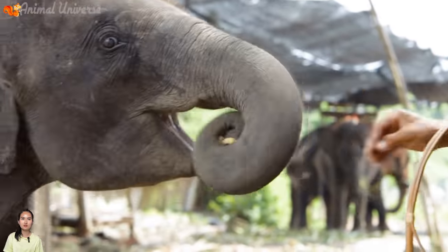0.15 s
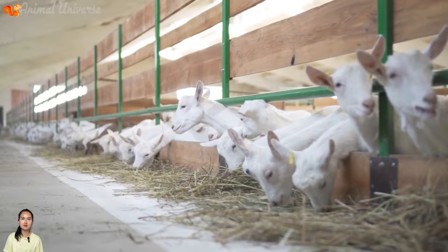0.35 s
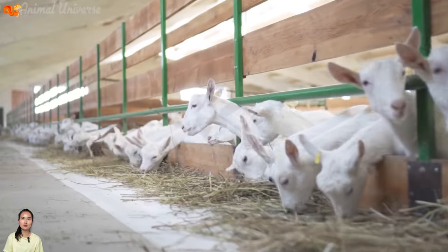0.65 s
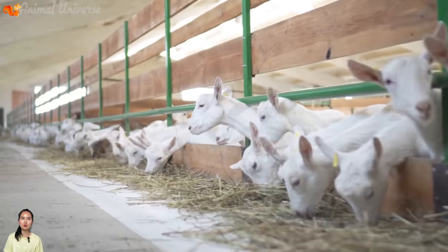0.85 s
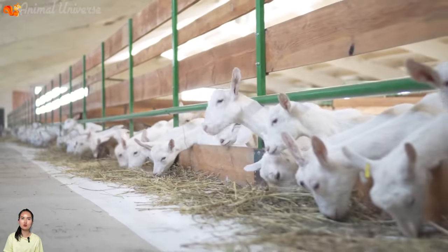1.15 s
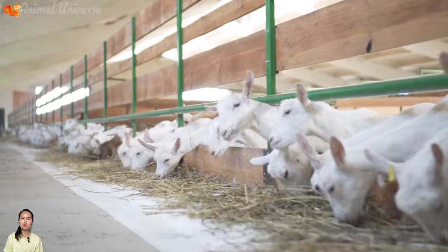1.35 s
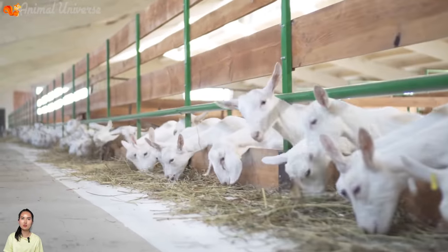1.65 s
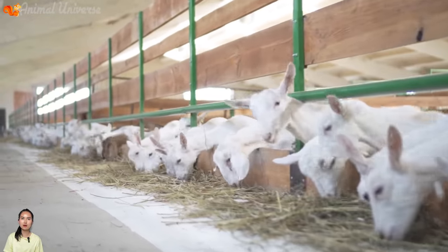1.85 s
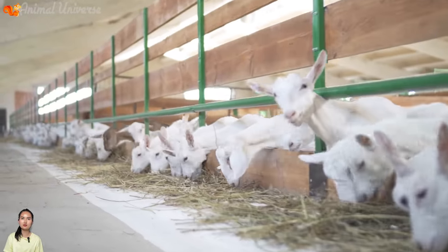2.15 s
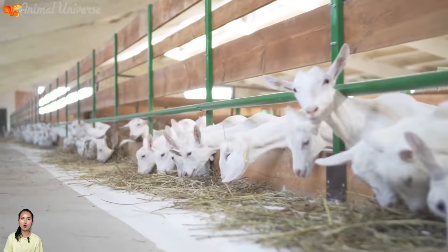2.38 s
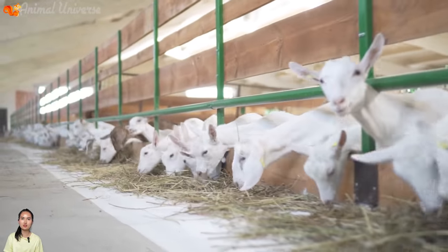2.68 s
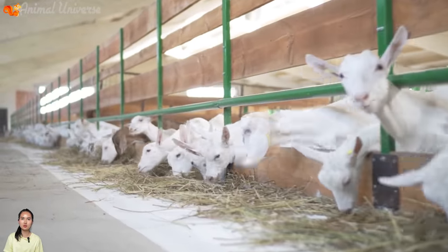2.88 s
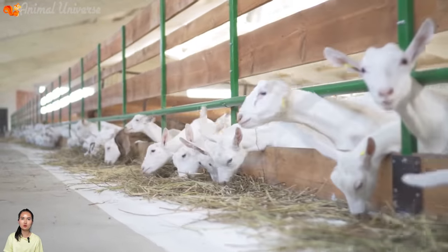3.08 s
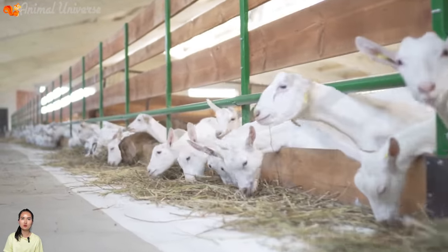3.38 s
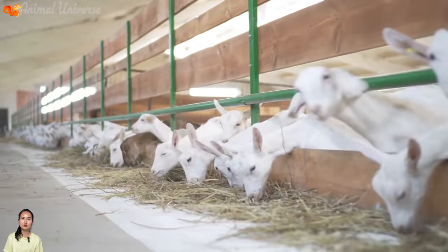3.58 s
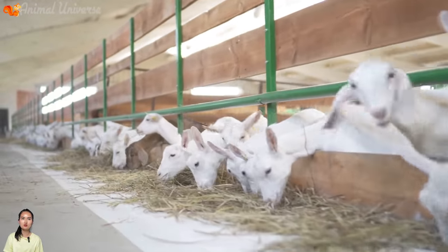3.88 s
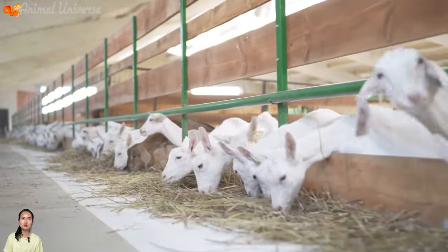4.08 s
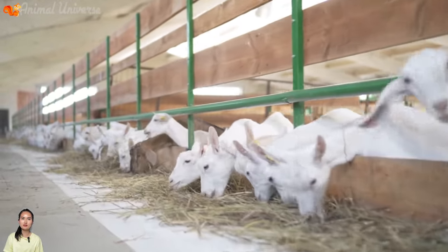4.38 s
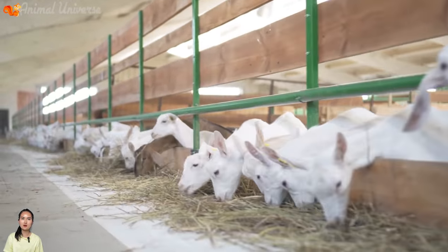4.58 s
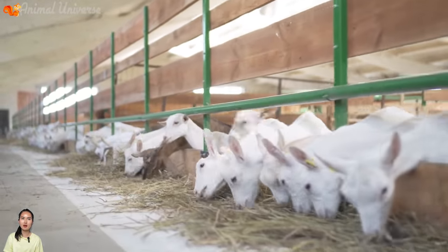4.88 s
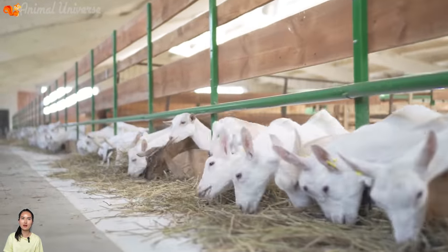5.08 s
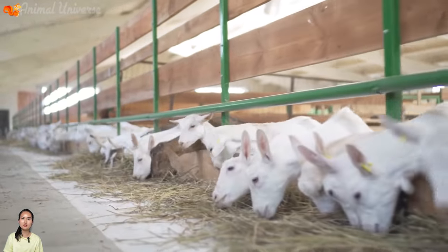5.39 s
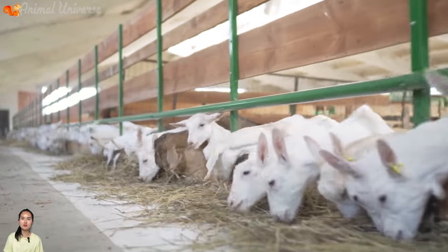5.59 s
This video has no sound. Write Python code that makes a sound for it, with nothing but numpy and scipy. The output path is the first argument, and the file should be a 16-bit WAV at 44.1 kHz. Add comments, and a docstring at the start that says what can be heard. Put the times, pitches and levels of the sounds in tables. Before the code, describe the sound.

A short, rough elephant roar stops dead, then goats bleat one after another in a barn over rustling hay and wooden knocks.

```python
"""Elephant roar, then goats in a barn

An elephant's heavy vocal folds flap out a short, rough roar that stops dead. Goats then bleat one after
another down a long barn: buzzing folds and breath, shaped by each throat. Most bleats throb about eleven
times a second, pitch, loudness and brightness swelling together. Underneath, the herd knocks at the
wooden trough and stirs the hay, with a few deep bumps and faint, recurring dry ticks."""
import sys
import numpy as np
from scipy import signal
from scipy.fft import rfft, irfft, next_fast_len
from scipy.io import wavfile
from scipy.ndimage import uniform_filter1d, map_coordinates

SR = 44100
rng = np.random.default_rng(int(sys.argv[2]) if len(sys.argv) > 2 else 0)


def inscribe(sig):
    """Save sig as 16-bit PCM at rate SR to the path in sys.argv[1].

    A 1-D sig is mono; a 2-D sig holds one channel per row.
    Samples are clipped to [-1, 1] before scaling.
    """
    pcm = np.round(np.clip(np.atleast_2d(sig).T, -1, 1) * 32767)
    wavfile.write(sys.argv[1], SR, pcm.astype(np.int16))


N = 253134
TOP_HZ = 16000
ROAR_END_S = 0.383
CLEAR_AIR, RELAXED_AIR, HOARSE_AIR = 0.035, 0.07, 0.13  # breathiness of a bleat
CRACK_DELAY_S, CRACK_WIDTH_S = 0.013, 0.008  # the voice cracks just after each throb
THROAT_DRIFT = 0.035  # share by which the throat's resonances wander up and down

# the herd's activity at the hay: t/s, shuffle level/dB, rustle level/dB
HERD_LEVELS = [(0.4, -41, -40), (1.2, -44, -40.5), (1.6, -45.5, -54), (2.28, -35.5, -46.5),
               (2.8, -35.5, -41), (3.12, -43.5, -46.5), (3.9, -38.5, -39.5), (4.7, -37, -42.5),
               (4.88, -42, -53.5), (5.1, -41, -42.5), (5.74, -33, -52)]
# noise colours of shuffling bodies, rustling hay, a tick and a wooden clack: f/Hz, level/dB
SHUFFLE_EQ = [(15, -20), (28, -10), (50, -6.5), (100, -0.5), (170, 0.5), (330, 1), (620, -4), (1300, -3.5),
              (1600, -7.5), (2300, -29.5), (4700, -43), (8000, -59), (16000, -56)]
HAY_EQ = [(500, -19), (2000, -4), (5000, -6.5), (9000, -14.5), (15500, -28)]
TICK_EQ = [(1500, -26), (4000, -11), (8000, -1.5), (12000, -5), (16000, -7)]
CLACK_EQ = [(200, -27), (500, 7), (1400, 5), (2600, 0), (6000, -47), (15000, -66)]
# dull, deep bumps: t/s, level/dB, swell and fade time/s, centre f/Hz
BUMP_CUES = [(0.867, -31, 0.032, 61.6), (4.732, -32.5, 0.1, 124), (5.735, -30, 0.032, 113.4)]
# dry ticks, each a quick three: t/s, level/dB
TICK_CUES = [(0.765, -23), (1.227, -25), (1.675, -20.5), (2.122, -26.5), (2.576, -23.5), (3.023, -29.5),
             (3.504, -26.5), (3.923, -22.5), (4.374, -29), (4.824, -24.5), (5.249, -27.5)]
# knocks on the trough: t/s, level/dB, clack trim/dB
KNOCK_CUES = [(0.466, -25, -10), (0.603, -34, 6), (0.815, -30, -10), (1.502, -31, 7), (1.957, -32, -15),
              (3.177, -31, -12), (3.282, -24, -14), (3.315, -26, -22), (3.437, -27, -22), (3.602, -28, -22),
              (3.753, -29, -20), (3.934, -27, -10), (4.034, -31, -15), (4.216, -23, -10), (4.654, -29, -14),
              (5.092, -29, 5), (5.588, -29, -15), (5.68, -23, -4)]
# modes of the trough's boards: f/Hz, level/dB, t60/s
TROUGH_MODES = [(84, -34, 0.19), (136, -7.5, 0.23), (178.3, -3.5, 0.23), (248.4, -3, 0.24),
                (320, -1.5, 0.09), (427, 13.5, 0.022)]
# the barn's reverb time: f/Hz, t60/s
BARN_DECAY = [(150, 1), (700, 0.31), (1500, 0.63), (3500, 0.34), (7000, 0.27), (14000, 0.0088)]
# narrow resonances that ring on in the barn: f/Hz, level/dB, t60/s
BARN_MODES = [(1330, -56, 0.6), (1490, -55, 0.8), (1645, -54, 1.3), (3400, -54, 1.4), (3880, -64, 1.1)]
# the roar's envelope: t/s, level/dB
ROAR_LEVELS = [(0, -15), (0.1, -16.5), (0.17, -15.5), (0.23, -15.5), (0.32, -17), (0.38, -15.5)]
# resonances of the elephant's trunk: f/Hz, level/dB
TRUNK_EQ = [(35, -110), (60, -28), (86, -34.5), (125, -13), (266, -12.5), (365, -1.5), (449, -15),
            (531, -4.5), (600, -11.5), (680, -7), (780, -21), (880, -15), (1000, -23.5), (1250, -28.5),
            (1610, -27.5), (1830, -36.5), (2350, -34.5), (3810, -52.5), (8000, -68), (16000, -71)]
# resonances of each goat's throat: f/Hz, level/dB
KID_THROAT = [(250, -17), (480, -7), (950, -12.5), (1480, -3), (1950, -17), (2300, -8.5), (2780, -26.5),
              (3480, -0.5), (3800, -8), (4550, -1), (5200, -10), (5700, -5.5), (6500, -16.5), (7300, -12),
              (8300, -27), (9700, -26.5), (12300, -28.5), (14000, -48)]
OLD_THROAT = [(150, -42), (250, -11), (661, 5), (777, 10), (928, 1), (1010, 2), (1300, -4), (1960, -9.5),
              (2160, -20), (2580, -7.5), (3080, -2.5), (3860, -19.5), (4600, -18.5), (5880, -27.5),
              (12000, -43), (15600, -79)]
LOUD_THROAT = [(250, -21), (450, -5), (900, -3.5), (1350, -1.5), (1780, -2), (2270, -17), (2700, -20.5),
               (3180, -8), (3800, -42), (5000, -17), (5700, -31.5), (6400, -24), (7400, -39.5), (9200, -31),
               (11800, -56), (12800, -42), (14000, -58)]
JOINING_THROAT = [(450, -27), (900, -1.5), (1200, -2), (1420, -12), (1650, -18), (2400, -14), (2850, -3),
                  (3250, 15.5), (3650, -6.5), (4500, -10), (5400, -8), (6400, -34), (7700, -14.5),
                  (12000, -54)]
CRYING_THROAT = [(200, -27), (320, -8), (620, -0.5), (780, 24.5), (950, 22), (1090, -7), (1300, 4),
                 (1650, 0), (1980, -1.5), (2400, -35.5), (3100, -17.5), (4100, -28), (4750, -19.5),
                 (5600, -42), (6300, -20.5), (7400, -49), (13000, -68)]
THIN_THROAT = [(250, -30.5), (420, 3), (850, 6), (1250, 6.5), (1650, 6.5), (2100, 3), (2600, 8.5),
               (3200, 3), (3700, -15), (4200, -13), (5200, -24), (5800, -6), (6200, -30), (6700, -11),
               (7500, -31), (9000, -34), (12000, -59)]
NASAL_THROAT = [(210, -55.5), (350, -13.5), (443, -21), (661, -17.5), (838, -19.5), (1020, -16.5),
                (1250, -23), (1630, -16.5), (2820, -30.5), (3520, -12.5), (4140, -28), (5160, -21.5),
                (7930, -26), (9330, -37), (12000, -62), (15600, -83), (22000, -120)]
# the kid's throat colour in its short bleat, stronger near 900 Hz: f/Hz, level/dB
SHORT_BLEAT_THROAT = [(250, -46), (450, -15), (900, -6.5), (1350, -7.5), (1750, -14), (2250, -8.5),
                      (2800, -19.5), (3300, -3), (3750, -14.5), (4550, -1), (5500, -12), (7500, -17),
                      (11000, -26.5), (15000, -48)]
# the jaw closes between throbs and the lowest resonance sinks away: f/Hz, level/dB
JAW_SHUT_EQ = [(480, -1.5), (850, -5), (1250, -1.5), (1700, 1.5), (2400, 2.5)]
# bleats, one row a throb: t/s, pitch/Hz, level/dB, fundamental trim/dB, treble trim/dB
SOFT_BLEAT = [(0.405, 422, -27.5, 6.5, -7.5), (0.498, 420.8, -26, -1.5, -10.5),
              (0.603, 421.5, -24.5, 0, -11), (0.712, 426.3, -26.5, 1.5, -4.5)]
RISING_BLEAT = [(0.797, 474.7, -28.5, 1.5, -2.5), (0.873, 497.8, -26.5, 2.5, -1),
                (0.952, 506.6, -23.5, 2, -3.5), (1.032, 517.3, -20.5, -13.5, -1.5),
                (1.128, 503.5, -17, -18.5, -2)]
SHORT_BLEAT = [(1.7, 391, -41.5, -5, -1), (1.792, 449.3, -24, -7.5, -5.5), (1.879, 450, -22.5, -9, 1.5),
               (1.976, 461.5, -19, -15, 1)]
DEEP_BLEAT = [(2.29, 284.5, -39.5, 3, -12), (2.378, 325.7, -28.5, -7.5, -8.5),
              (2.465, 327, -26, -9.5, -10.5), (2.545, 336.1, -24.5, -6.5, -11.5),
              (2.625, 340.3, -24.5, -3, -13.5), (2.712, 342.3, -24.5, -6.5, -13),
              (2.805, 340, -25.5, -3.5, -13), (2.89, 334, -25.5, -5.5, -11.5), (2.972, 321.7, -27, -14, -8),
              (3.005, 284, -38, -5, -19)]
LOUD_BLEAT = [(3.205, 433.8, -23, -4, -12.5), (3.29, 462.6, -18, -1.5, -8), (3.383, 459.5, -17, -4, -8),
              (3.477, 459.7, -16.5, -3, -6), (3.575, 453, -17, -3.5, -7), (3.675, 449.5, -18, -3.5, -8),
              (3.775, 436, -22.5, -2, -5.5), (3.868, 408.7, -27, -10, -11.5)]
SECOND_DEEP_BLEAT = [(3.96, 291.3, -28, -7, -12.5), (4.05, 340.1, -20.5, -5.5, -11),
                     (4.132, 340.6, -22, -7, -12), (4.215, 346, -21.5, -4, -7),
                     (4.295, 350.8, -21, -0.5, -16), (4.39, 359.6, -22.5, -10.5, -0.5)]
JOINING_BLEAT = [(4.287, 471, -16.5, -29, 1.5), (4.392, 397, -21.5, -16, -6.5)]
KID_BLEAT = [(4.245, 452.7, -27.5, -5, -4), (4.34, 454, -32, 1, 2), (4.41, 469, -25, -29, 1)]
FAINT_BLEAT = [(4.95, 436.7, -35, -9, 2)]
NASAL_BLEAT = [(5.27, 333.8, -30, 1.7, -5.5), (5.372, 412.4, -28, 3.5, 2), (5.468, 431.5, -23.5, 1, 0),
               (5.565, 433, -22.5, 0.52, 0.5), (5.657, 434.7, -23.5, 1.43, 0), (5.748, 425, -27, 6.4, 1.5)]
# held calls that waver without a break: t/s, pitch/Hz, level/dB, fundamental trim/dB, treble trim/dB
CRYING_BLEAT = [(4.462, 297, -18.5, -31, -12), (4.483, 307.5, -17, -32, -12.5),
                (4.505, 335, -19.5, -17, -6), (4.528, 314.3, -20, -25, -7), (4.555, 314.7, -26, -14, -1.5),
                (4.592, 346, -25, -6, 1.5), (4.625, 320, -19.5, -25, -6.5), (4.685, 329.6, -21, -17, -4.5),
                (4.71, 297, -20, -24, -10.5), (4.75, 266, -19, -18, -16.5)]
THIN_BLEAT = [(5.058, 444, -29, -10, 0), (5.087, 395, -28.5, -21, -1), (5.12, 410.7, -29.5, -11, 0),
              (5.148, 465.6, -33, -15, 4.5), (5.165, 419.4, -31.5, -8, 6.5),
              (5.186, 432.8, -26, -1.5, -4.5), (5.22, 418.3, -34.5, -6, 6), (5.275, 411.1, -31.5, -21, -3),
              (5.32, 392.4, -30, -10, -5), (5.365, 406.8, -25.5, -3, -21)]


def amp(db):
    """Decibels to gain."""
    return 10 ** (np.asarray(db) / 20)


def unit(x):
    """x at rms 1."""
    return x / np.sqrt(np.mean(x ** 2) + 1e-20)


def levelled(x):
    """x with its gain ridden to hold rms 1 over 40 ms."""
    return x / np.sqrt(np.abs(uniform_filter1d(x * x, SR // 25)) + 1e-12)


def along(points, hz):
    """(f/Hz, value) points read on a log axis."""
    f, v = np.transpose(points)
    return np.interp(np.log(hz + 1), np.log(f + 1), v)


def curves(rows, t):
    """Automation: each column after the time, read at times t."""
    times, *columns = np.transpose(rows)
    return [np.interp(t, times, column) for column in columns]


def wobble(t, rate):
    """A smooth random curve, rate knots a second."""
    u = (t - t[0]) * rate
    return map_coordinates(rng.standard_normal(int(u[-1]) + 4), [u])


def lowpass(hz, edge_hz):
    """Gain of a steep low-pass."""
    return 1 / (1 + (hz / edge_hz) ** 12)


def filtered(x, response):
    """x through a response given as a function of frequency."""
    n = x.shape[-1]
    size = next_fast_len(n + 8192)
    return irfft(rfft(x, size) * response(np.fft.rfftfreq(size, 1 / SR)), size)[..., :n]


def coloured(x, eq, size=2048):
    """x through a minimum-phase EQ curve."""
    cepstrum = irfft(np.log(amp(along(eq, np.fft.rfftfreq(size, 1 / SR)))))
    cepstrum[1:size // 2] *= 2
    cepstrum[size // 2 + 1:] = 0
    return signal.fftconvolve(x, irfft(np.exp(rfft(cepstrum))))[:len(x)]


def noise(eq, n, width):
    """Coloured stereo noise of rms 1; width is side over mid."""
    mid, side = filtered(rng.standard_normal((2, n)), lambda hz: amp(along(eq, hz)))
    return unit(np.array([mid + width * side, mid - width * side]))


def add(out, x, start):
    """Mix stereo x into out from start, in seconds."""
    i = max(round(start * SR), 0)
    out[:, i:i + x.shape[1]] += x[:, :max(N - i, 0)]


def herd():
    """The bed: many animals shuffle and pull at the hay."""
    t = np.arange(N) / SR
    shuffle_db, rustle_db = curves(HERD_LEVELS, t)
    shuffle = noise(SHUFFLE_EQ, N, width=.45) * amp(shuffle_db + 1.8 * wobble(t, 18))
    hay = noise(HAY_EQ, N, width=.7) * amp(rustle_db + 1.5 * wobble(t, 60))
    return shuffle + hay


def bumps():
    """Something heavy shifts with a soft, deep rumble that swells and fades."""
    out, t = np.zeros((2, N)), np.arange(N) / SR
    for peak, db, fade, hz in BUMP_CUES:
        eq = [(hz / 4, -12), (hz, 0), (1.97 * hz, -7), (3 * hz, -35), (10 * hz, -90)]
        out += noise(eq, N, width=.099) * amp(db) * np.exp(-np.abs(t - peak) / fade)
    return out


def ticks(spacing_s=.009, t60=.005):
    """Tiny dry ticks in quick threes."""
    out, t = np.zeros((2, N)), np.arange(SR // 50) / SR
    decay = amp(-60 * t / t60)
    for start, db in TICK_CUES:
        for k in range(3):
            tick = noise(TICK_EQ, len(t), width=.47) * amp(db - .45 * k) * decay
            add(out, tick, start + k * spacing_s)
    return out


def trough():
    """Hooves and heads bump the wooden boards: a dull thud with a short clack."""
    out, t = np.zeros((2, N)), np.arange(SR // 4) / SR
    attack = 1 - np.exp(-t / .0016)
    for start, db, clack_db in KNOCK_CUES:
        thud = np.zeros(len(t))
        for hz, mode_db, t60 in TROUGH_MODES:
            decay = amp(mode_db + rng.normal(0, 4.1) - 60 * t / t60)
            detuned_hz = hz * rng.uniform(.897, 1.1)
            thud += decay * np.sin(2 * np.pi * (detuned_hz * t + rng.random()))
        clack = noise(CLACK_EQ, len(t), width=.5) * amp(clack_db - 2 - 60 * t / .06)
        add(out, amp(db) * (amp(-3.5) * thud + clack) * attack, start)
    return out


def barn_reverb(x):
    """The barn's diffuse tail, different at each ear, with a few tones that ring on."""
    hz, t, spectrum = signal.stft(rng.standard_normal((2, SR * 3 // 4)), SR, nperseg=256)
    decay = amp(-60 * t / along(BARN_DECAY, hz)[:, None])
    attack = 1 - np.exp(-t / .00056)
    _, tail = signal.istft(spectrum * decay * attack, SR, nperseg=256)
    age = np.arange(tail.shape[1]) / SR
    rings = sum(amp(db - 60 * age / t60) * np.sin(2 * np.pi * (f * age + rng.random((2, 1))))
                for f, db, t60 in BARN_MODES)
    mid, side = tail / np.linalg.norm(tail[0]) + rings
    side = filtered(side, lambda hz: hz / (hz + 300))  # long waves reach both ears alike
    return signal.fftconvolve(x[None], np.array([mid + side, mid - side]), axes=1)


def early_reflections(x, count=7):
    """Nearby boards add weak copies within a few milliseconds, different at each ear."""
    delays = rng.uniform(.0005, .006, (2, count, 1))
    copies = lambda hz: np.exp(-2j * np.pi * hz * delays).sum(1) * hz / (hz + 1500)
    return filtered(x, lambda hz: 1 + .14 * copies(hz))


def folds(pitch, breath, zip_hz=1500):
    """Vocal folds: one pulse a cycle, and a puff of air noise with each opening."""
    phase = 2 * np.pi * np.cumsum(pitch) / SR
    harmonics = int(TOP_HZ / pitch.mean())
    pulses = np.sin((harmonics + .5) * phase) / np.sin(phase / 2) - 1
    # the folds close like a zip, which smears each pulse in time
    pulses = filtered(pulses, lambda hz: np.exp(-1j * ((hz / 1500) ** 2 + 4 * np.arctan(hz / zip_hz))))
    puffs = unit(rng.standard_normal(len(pitch)) * (1 + .5 * np.cos(phase)))
    puffs = filtered(puffs, lambda hz: np.clip(hz / 2500, 1, 2))  # more turbulence in the top end
    return unit(pulses) + breath * puffs


def elephant(pitch_hz=175, tone_hz=163.8, tone_db=-6, left_lag_ms=.466):
    """Heavy folds flap irregularly over a steady deep tone, with a rasp of air through the trunk."""
    t = np.arange(round(ROAR_END_S * SR)) / SR
    pitch = pitch_hz * (1 + .015 * wobble(t, 15) + .035 * wobble(t, 220))
    flaps = folds(pitch, breath=.5) * amp(3.5 * wobble(t, 110))
    tone_pitch = tone_hz * (1 + .012 * wobble(t, 30))
    tone = np.sqrt(2) * np.sin(2 * np.pi * np.cumsum(tone_pitch) / SR)
    voice = unit(coloured(flaps, TRUNK_EQ)) + amp(tone_db) * tone
    left = np.interp(t - left_lag_ms / 1000, t, voice)
    roar = unit(np.array([left, voice]) + noise(TRUNK_EQ, len(t), width=.74))
    level_db, = curves(ROAR_LEVELS, t)
    gate = np.clip((ROAR_END_S - t) / .00084, 0, 1)
    out = np.zeros((2, N))
    add(out, roar * amp(level_db) * gate, 0)
    return out


def slackness(t, beats, hold, lean, snap):
    """0 on each throb, 1 between; hold broadens throbs, snap steepens them, lean < 1 hastens the fall."""
    place = np.interp(t, beats, np.arange(len(beats))) % 1
    slack = np.abs(np.sin(np.pi * place ** lean)) ** (2 * hold)
    return slack ** snap / (slack ** snap + (1 - slack) ** snap)


def throat_and_jaw(buzz, throat, slack):
    """The throat's drifting resonances shape the buzz; the jaw closes as the voice slackens."""
    dark = coloured(buzz, [(hz * (1 - THROAT_DRIFT), db) for hz, db in throat])
    bright = coloured(buzz, [(hz * (1 + THROAT_DRIFT), db) for hz, db in throat])
    blend = .5 + .5 * np.tanh(wobble(np.arange(len(buzz)) / SR, 30.55))
    jaw_open = dark + blend * (bright - dark)
    jaw_shut = filtered(jaw_open, lambda hz: amp(along(JAW_SHUT_EQ, hz)))
    return jaw_open + slack * (jaw_shut - jaw_open)


def bleat(throbs, throat, scoop, rise_s, fall_s, wet_db, lead_ms, pan_db, dip_db=0, hold=1, lean=.81,
          snap=1, sag=0, arch_s=.03, strain=0, air=RELAXED_AIR, rasp_db=None):
    """One goat call: effort drops between throbs, so it gets softer (dip_db), lower (sag) and duller."""
    beats = np.sort([row[0] for row in throbs])
    first, last = beats[0], beats[-1]
    start, stop = first - 2 * rise_s, last + 2 * fall_s
    t = np.arange(round(start * SR), round(stop * SR)) / SR
    pitch, db, low_db, treble_db = curves(throbs, t)
    pitch = uniform_filter1d(pitch, SR // 70, mode="nearest")
    slack = slackness(t + .0015 * wobble(t, 30), beats, hold, lean, snap)
    ends = (np.maximum(first - t, 0) / rise_s) ** 2 + (np.maximum(t - last, 0) / fall_s) ** 2
    # the pitch arches over each throb and scoops down at both ends of the call
    arches = np.exp(-((np.clip(t, first, last)[:, None] - beats) / arch_s) ** 2).max(1)
    droop = sag * (1 - arches) * (1 + .25 * wobble(t, 12))
    # strain cracks the voice: the folds jitter and alternate strong and weak pulses
    crack_windows = np.exp(-((t[:, None] - beats - CRACK_DELAY_S) / CRACK_WIDTH_S) ** 2).sum(1)
    crack = np.clip(strain, 0, 3) * crack_windows
    jitter = .0025 * (1 + .7 * strain) * wobble(t, 80) + .0013 * (1 + 6 * crack) * wobble(t, 400)
    pitch = pitch * (1 - droop - scoop * np.tanh(ends) + jitter)
    alternation = 1 + .14 * crack * np.sin(np.pi * np.cumsum(pitch) / SR)
    buzz = alternation * folds(pitch, air * (1 + .3 * strain + crack), zip_hz=900)
    voice = throat_and_jaw(buzz, throat, slack)
    # three bands: the fundamental lingers after each push, and the treble fades first
    low = filtered(voice, lambda hz: lowpass(hz, 1.5 * pitch.mean()))
    treble = filtered(voice, lambda hz: 1 - lowpass(hz, 2400))
    mids = voice - low - treble
    db = db - dip_db * slack - 13 * ends + (.7 + .7 * crack) * wobble(t, 170)
    late_db = np.interp(t - .01, t, db + low_db)
    early_db = np.interp(t + .00083, t, db + treble_db) - .05 * dip_db * slack
    voice = amp(db) * levelled(mids) + amp(late_db) * levelled(low) + amp(early_db) * levelled(treble)
    if rasp_db is not None:  # a high rasp carries on between throbs, dipping only 3 dB
        rasp = filtered(coloured(folds(pitch, breath=.5), throat), lambda hz: 1 - lowpass(hz, 4500))
        voice += levelled(rasp) * amp(rasp_db - 3 * slack - 13 * ends)
    ears = np.array([[1], [-1]])  # positive pan_db and lead_ms favour the left
    pan = lambda hz: amp(ears * pan_db / 2) * np.exp(ears * 1j * np.pi * hz * lead_ms / 1000)
    out = np.zeros((2, N))
    add(out, early_reflections(filtered(voice, pan)), start)
    add(out, amp(wet_db) * barn_reverb(voice), start)
    return out


def goats():
    """A kid and several does bleat from along the trough, some overlapping."""
    return sum([
        bleat(SOFT_BLEAT, KID_THROAT, scoop=.065, rise_s=.03, fall_s=.026, dip_db=17.5, hold=.59,
              sag=.04, strain=1, wet_db=-12, lead_ms=.25, pan_db=-.5),
        bleat(RISING_BLEAT, KID_THROAT, scoop=.09, rise_s=.03, fall_s=.035, dip_db=26.5, hold=1.4,
              lean=.91, snap=2.6, sag=.075, strain=2.15, air=HOARSE_AIR,
              wet_db=-10.5, lead_ms=.2, pan_db=-2),
        bleat(SHORT_BLEAT, SHORT_BLEAT_THROAT, scoop=.053, rise_s=.033, fall_s=.024, dip_db=19, hold=.8,
              sag=.07, arch_s=.017, strain=1.6, wet_db=-14, lead_ms=.2, pan_db=-2.5),
        bleat(DEEP_BLEAT, OLD_THROAT, scoop=.055, rise_s=.04, fall_s=.026, dip_db=4, hold=1.7,
              sag=.061, arch_s=.02, strain=.23, air=CLEAR_AIR, wet_db=-10, lead_ms=0, pan_db=-2.5),
        bleat(LOUD_BLEAT, LOUD_THROAT, scoop=.095, rise_s=.025, fall_s=.059, dip_db=23, hold=1.2,
              snap=1.2, sag=.055, arch_s=.014, strain=1.84, rasp_db=-41,
              wet_db=-17.5, lead_ms=.11, pan_db=-2),
        bleat(SECOND_DEEP_BLEAT, OLD_THROAT, scoop=.08, rise_s=.054, fall_s=.04, dip_db=6.5, hold=.49,
              sag=.07, arch_s=.022, strain=1, wet_db=-7.5, lead_ms=0, pan_db=-1.5),
        bleat(JOINING_BLEAT, JOINING_THROAT, scoop=.12, rise_s=.032, fall_s=.0378, dip_db=13.5,
              hold=.98, sag=.1, strain=.3, air=CLEAR_AIR, wet_db=-10.5, lead_ms=-.1, pan_db=0),
        bleat(KID_BLEAT, KID_THROAT, scoop=.1, rise_s=.038, fall_s=.03, dip_db=14,
              sag=.12, strain=.59, wet_db=-10, lead_ms=.13, pan_db=-3),
        bleat(CRYING_BLEAT, CRYING_THROAT, scoop=.0524, rise_s=.016, fall_s=.0078,
              strain=.26, wet_db=-17, lead_ms=.051, pan_db=2.5),
        bleat(FAINT_BLEAT, THIN_THROAT, scoop=.11, rise_s=.022, fall_s=.045,
              wet_db=-9, lead_ms=.22, pan_db=-3),
        bleat(THIN_BLEAT, THIN_THROAT, scoop=.08, rise_s=.025, fall_s=.04,
              air=CLEAR_AIR, wet_db=-13.5, lead_ms=.24, pan_db=-1.5),
        bleat(NASAL_BLEAT, NASAL_THROAT, scoop=.12, rise_s=.034, fall_s=.04, dip_db=20, hold=1.25,
              snap=1.53, sag=.1, arch_s=.035, strain=1, wet_db=-22.5, lead_ms=.053, pan_db=0)])


def scene():
    """The barn takes over the moment the roar stops."""
    barn_gate = np.clip((np.arange(N) / SR - ROAR_END_S) / .0014, 0, 1)
    return elephant() + barn_gate * (goats() + trough() + bumps() + ticks() + herd())


def record(dry):
    """A brick-wall low-pass on the whole mix."""
    return filtered(dry, lambda hz: hz < TOP_HZ)


dry = scene()
out = record(dry)
inscribe(out)
```